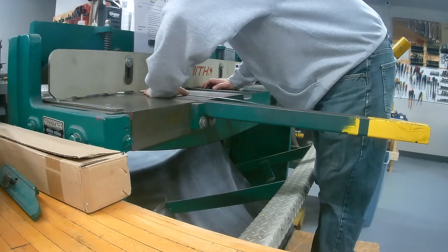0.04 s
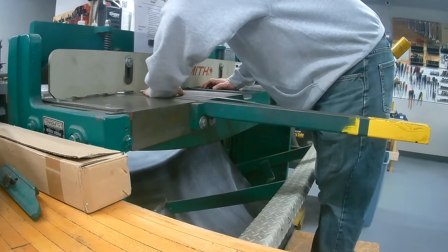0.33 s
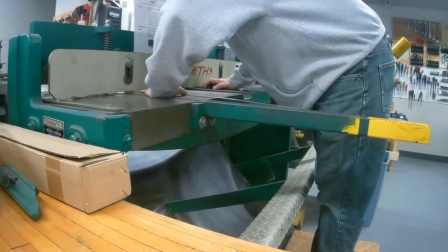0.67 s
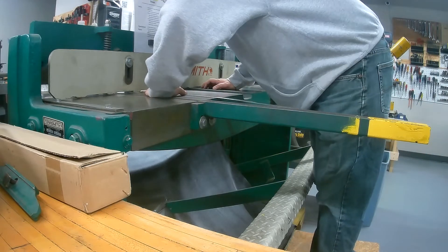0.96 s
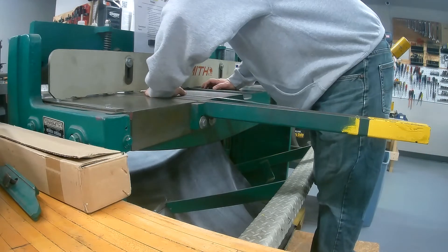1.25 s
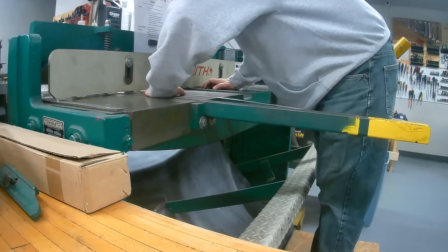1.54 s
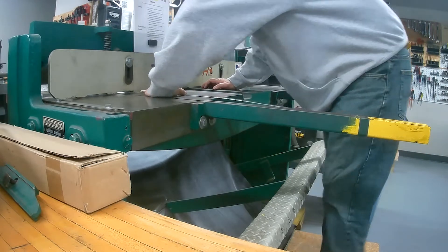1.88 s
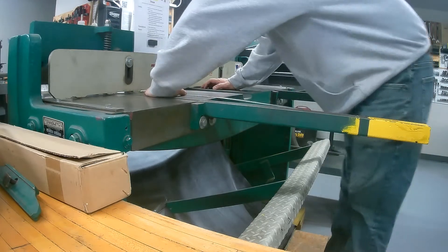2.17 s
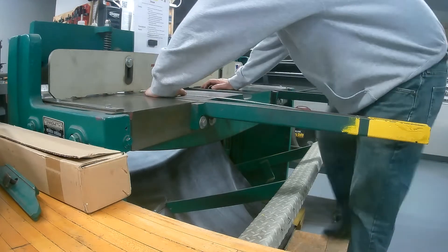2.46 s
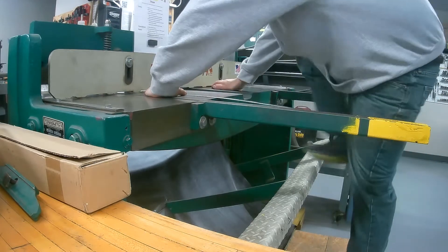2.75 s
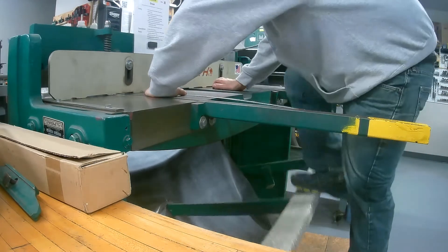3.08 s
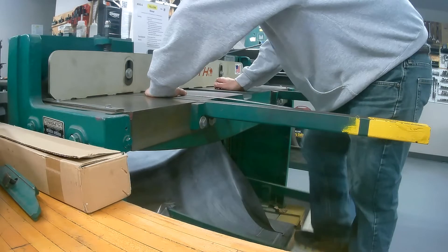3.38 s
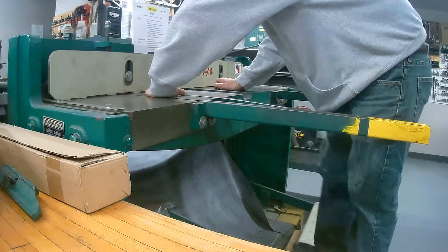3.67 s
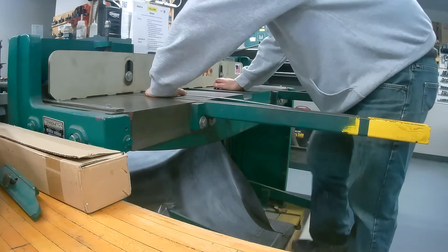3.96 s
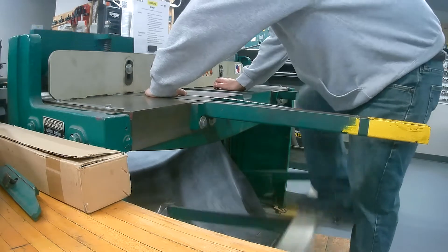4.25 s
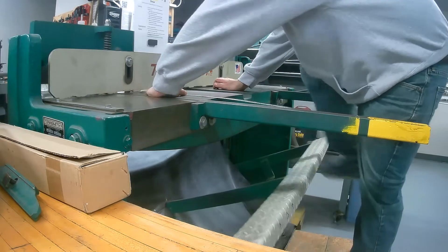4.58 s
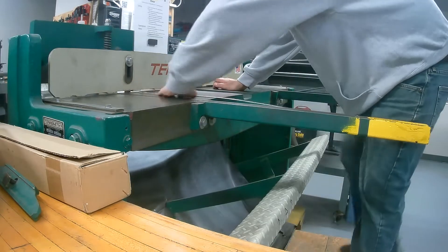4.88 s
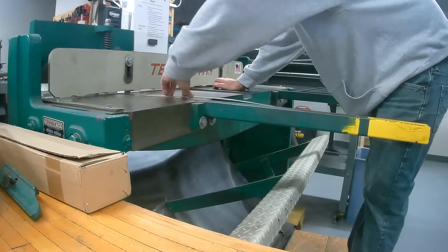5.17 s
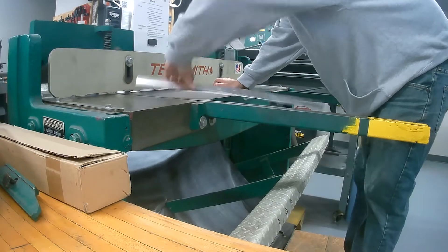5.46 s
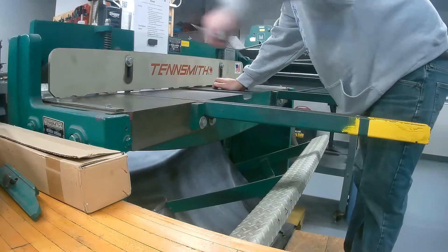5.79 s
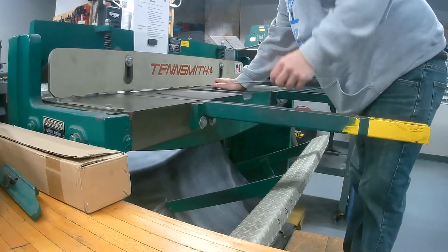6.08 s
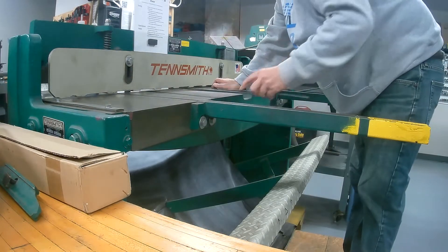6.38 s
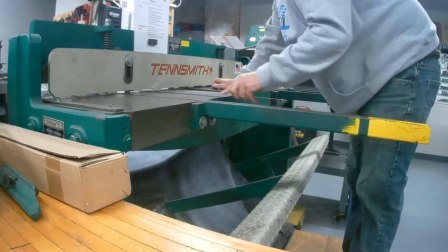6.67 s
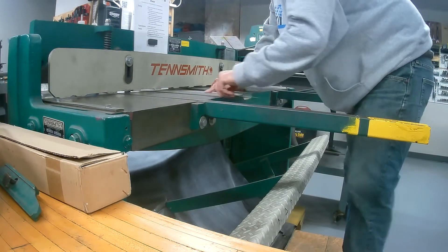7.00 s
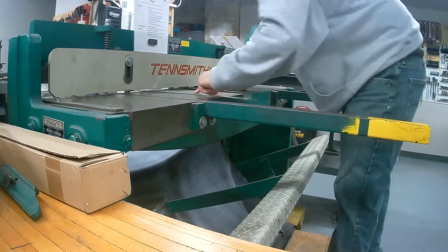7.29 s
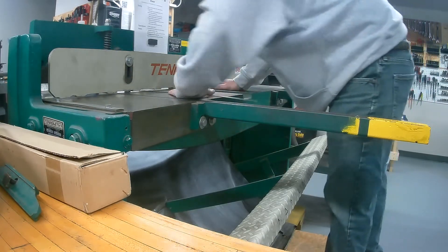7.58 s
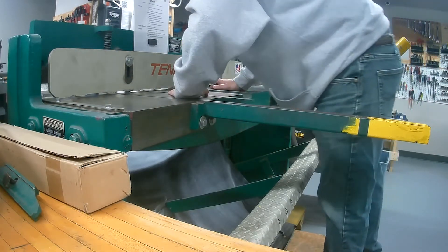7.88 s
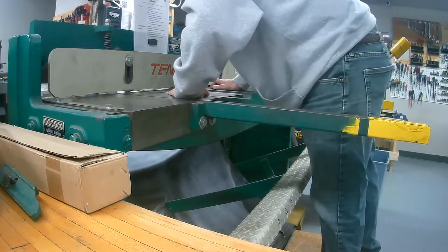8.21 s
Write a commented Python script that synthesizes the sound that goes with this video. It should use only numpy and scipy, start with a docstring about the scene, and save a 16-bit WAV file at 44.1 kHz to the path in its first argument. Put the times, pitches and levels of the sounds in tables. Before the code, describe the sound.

A foot-operated metal shear crunches through a sheet, springs back with a ringing clang, then sheet metal taps and scrapes in a quiet workshop.

```python
"""Treadle shear in a quiet workshop.

The foot drives the blade through a metal sheet; tiny slips and fractures shake the steel and crunch.
The spring rubs the blade back up the cut edge until it clangs on its stop, ringing the frame.
Hands and shoes bump softly; the sheet is tapped and slid over the steel table. Ventilation rumbles."""
import sys
import numpy as np
from scipy import signal
from scipy.fft import rfft, irfft, next_fast_len
from scipy.io import wavfile
from scipy.ndimage import map_coordinates

SR = 44100
rng = np.random.default_rng(int(sys.argv[2]) if len(sys.argv) > 2 else 0)


def store_wav(level_fs):
    """Save 16-bit WAV to argv[1]."""
    pcm = np.round(np.clip(np.atleast_2d(level_fs), -1, 1) * 32767)
    wavfile.write(sys.argv[1], SR, pcm.T.astype(np.int16))


N = 367794


# loaded shear, broad response: f/Hz, level/dB
CUT_COLOUR = [(21, -57), (35, -14.5), (70, -18.5), (97, -26.5), (128, -5.5), (224, -17), (489, -1.5),
              (656, 0), (798, 5), (1180, -4), (1470, -12), (2170, -24), (2770, -42), (4740, -47),
              (5770, -60), (12000, -60), (15600, -78), (22000, -120)]
# loaded shear, resonances: f/Hz, width/Hz, level/dB re broad response
CUT_PEAKS = [(48, 25, 1), (75.3, 7, 12), (127.5, 13.6, 7), (177, 19, 1.5), (524, 21, 4), (626, 6.7, 0),
             (820, 39, 0), (1145, 26, -0.5), (3190, 160, 5.5), (5050, 197, 14.5)]
# load shift; rows frame, blade, sheet edge, grit: level/dB, drift/(dB/s)
CUT_PARTS = [(-32, 14.5), (-24.5, 1), (-25, -13.5), (-52, 8)]
# tearing sheet: f/Hz, level/dB
CRUNCH_COLOUR = [(120, -3), (270, 21), (500, 5.5), (800, 16), (1160, 22.5), (1450, -2), (2150, 8.5),
                 (2800, -2), (3800, -2), (4900, 1.5), (5800, -13), (8000, -18), (11000, -15.5),
                 (15500, -21.5)]

def downstroke():
    """The blade grinds down under the foot, with a bright crunch as the sheet parts."""
    start_s = 2.979
    speed = movement(start_s, attack_s=0.014, rise_db=7, hold_s=0.53, release_s=0.55)
    gains = [speed * amp(db + db_per_s * since(start_s)) for db, db_per_s in CUT_PARTS]
    grind = blade_friction(gains, CUT_COLOUR, CUT_PEAKS, slips_per_s=1600, spread_db=3.5)
    fractures = slips(per_s=1800, spread_db=6.5) * amp(1.7 * wobble(45))
    crunch = coloured(steel(fractures, t60_s=0.06, contrast=0.57), CRUNCH_COLOUR)
    parting = movement(3.14, attack_s=0.1, rise_db=13, hold_s=0.085, release_s=0.025)
    return grind + amp(-27) * parting * crunch


# free blade, broad response: f/Hz, level/dB
RETURN_COLOUR = [(35, -14), (60, -12), (95, -19.5), (134, -4.5), (210, -12.5), (272, -5.5), (330, -8),
                 (489, -8), (581, -12.5), (778, -1), (1400, -24), (1600, -27), (1900, -27), (4630, -33.5),
                 (9000, -45.5)]
# free blade, resonances: f/Hz, width/Hz, level/dB re broad response
RETURN_PEAKS = [(135, 7.2, -11), (270, 32, 2.5), (370, 42, 2.5), (482, 28, 6.5), (797, 85, 1),
                (2320, 43, 3), (3160, 88, 2), (3540, 31, 9), (4740, 200, 11.5)]
# rows frame, blade, sheet edge, grit: level/dB at full speed, speed exponent
RETURN_PARTS = [(-25.5, .9), (-20.5, 1), (-32.5, 1), (-40, 2.14)]

def upstroke():
    """The spring speeds the blade up the cut edge; faster rubs louder and brighter."""
    speed = movement(4.022, attack_s=0.226, rise_db=12.2, hold_s=0.242, release_s=0.03, bend=2.7)
    gains = [amp(db) * speed ** exponent for db, exponent in RETURN_PARTS]
    return blade_friction(gains, RETURN_COLOUR, RETURN_PEAKS, slips_per_s=2600, spread_db=3)


def blade_friction(gains, colour, peaks, slips_per_s, spread_db):
    """Juddering slips shake frame, blade, sheet edge and grit, one band each."""
    drive = slips(slips_per_s, spread_db) * amp(wobble(45))
    heavy = steel(drive, t60_s=0.059, contrast=0.1)
    thin = steel(drive, t60_s=0.18, contrast=0.49)
    bands = [(heavy, 35, 350), (heavy, 350, 1100), (thin, 1100, 2600), (thin, 2700, 9000)]
    return sum(gain * body_band(x, colour, peaks, lo_hz, hi_hz)
               for gain, (x, lo_hz, hi_hz) in zip(gains, bands))


# machine impacts: t/s, relative clang/dB, thud/dB, crack/dB
BLOWS = [(2.986, -35.5, -51, -52), (3.011, -22.5, -28, -54), (3.325, -24, -15.5, -41),
         (3.356, -23.5, -11.5, -58), (3.832, -37, -34, -66), (4.028, -39, -39.5, -65),
         (4.217, -27, -38, -35.5), (4.484, -17, -11, -24), (4.511, -15.5, -20, -41),
         (4.536, -19.5, -19.5, -53)]
# impact spectra: f/Hz, level/dB
CLANG_COLOUR = [(29, -61), (50, -35), (140, 1), (207, -9), (273, -4.5), (320, -11), (637, -4.5), (820, 2.5),
                (1360, -6.5), (1490, -15.5), (1600, -9.5), (1960, -17.5), (2700, -35.5), (4580, -29.5),
                (12000, -91), (15600, -84), (22000, -120)]
THUD_COLOUR = [(30, -19), (70, -18), (120, -1.5), (350, -2), (700, 0), (1200, -13.5), (3000, -48),
               (8000, -80)]
CRACK_COLOUR = [(1000, -20), (2600, -7), (3600, 0), (5200, 3.5), (6200, -9.5), (10000, -35), (15000, -29.5)]
# clang damping: f/Hz, t60/s
CLANG_DECAY = [(100, 0.69), (260, 2.1), (700, 0.95), (1840, 1.11), (4850, 1.6)]

def blows():
    """The blade bites, bottoms out and slams back on its stop."""
    out, t = np.zeros(N), np.arange(2 * SR) / SR
    for start_s, clang_db, thud_db, crack_db in BLOWS:
        clang = amp(clang_db - 5) * burst(CLANG_COLOUR, CLANG_DECAY)
        thud = amp(thud_db + 1) * burst(THUD_COLOUR, [(100, 0.24), (800, 0.13)])
        crack = amp(crack_db + 1.5) * burst(CRACK_COLOUR, [(4000, 0.13), (10000, 0.08)])
        add(out, start_s, (clang + thud + crack) * (1 - np.exp(-t / 0.0019)))
    return out


# frame modes: f/Hz, relative level/dB, t60/s
FRAME_MODES = [(71.8, -20.5, 2.2), (132.6, -8.5, 0.71), (139.8, -11, 0.59), (170.2, -18, 0.92),
               (279.8, -4, 0.74), (385, -18, 1.3), (494, -15, 2.3), (558, -11, 1.2), (730, -9, 1.14),
               (784, -28.5, 3.6), (815, -5.5, 1.04), (842, -23.5, 3.17), (880, -13, .8), (993, -7.5, 0.58),
               (1328, -8.5, 0.94), (1324, 2.5, 0.24), (1618, -1, 0.64), (1683, -10, 0.4), (1940, -3, 0.64),
               (1990, -13.5, 0.62), (2580, -19, 0.45), (3080, -27.5, 0.88), (3540, -31, .6),
               (4000, -25, 0.45), (4662, -26, 1.02), (5250, -32.5, 1.3)]

def frame_ring():
    """The treadle's upper stop rings the frame; loose joints make each mode wander and flutter."""
    out, t = np.zeros(N), np.arange(2 * SR) / SR
    stop_s = 4.508
    onset = amp(-16) * (1 - np.exp(-t / 0.0029))
    for hz, db, t60_s in FRAME_MODES:
        linewidth_hz = 5.4 * np.sqrt(hz / 1500)
        wander_rad = np.cumsum(rng.standard_normal(len(t))) * np.sqrt(2 * np.pi * linewidth_hz / SR)
        flutter_db = 2.3 * np.interp(t, np.linspace(0, t[-1], 90), rng.standard_normal(90))
        mode = np.sin(2 * np.pi * (hz * t + rng.random()) + wander_rad)
        add(out, stop_s, onset * amp(db + flutter_db - 60 * t / t60_s) * mode)
    return out


# steel sticking on steel: centre t/s, half length/s, f/Hz, relative level/dB
SQUEALS = [(2.989, .008, 624, -18), (3.026, .012, 801, -14), (3.07, .06, 4970, -54), (3.56, .12, 5190, -54),
           (4.1, .06, 2163, -50.5), (4.22, .07, 2500, -47.5), (4.219, .011, 782, -14),
           (4.242, .012, 784, -9), (4.35, 0.027, 3120, -41), (4.406, .02, 799, -15),
           (4.441, 0.1, 1552, -30.5), (6.398, .23, 4700, -63)]

def squeals():
    """Brief stick-slip locks onto a steel mode, slightly unsteady in pitch."""
    out, t = np.zeros(N), np.arange(N) / SR
    drift_hz = 8 * wobble(70)
    for centre_s, half_s, hz, db in SQUEALS:
        near = abs(t - centre_s) < 2 * half_s
        swell = np.exp(-2 * ((t[near] - centre_s) / half_s) ** 2)
        out[near] += amp(db + 2) * swell * np.sin(2 * np.pi * np.cumsum(hz + drift_hz[near]) / SR)
    return out


# hand and shoe contacts: t/s, relative level/dB, thump offset/dB
BUMPS = [(1.637, -37.5, -26), (1.951, -33.5, -13.5), (1.989, -37.5, -14), (2.884, -41, -3),
         (2.936, -39, -4), (5.033, -24.5, -6), (5.084, -28.5, -10.5), (5.809, -37.5, -25),
         (6.314, -40, -19), (6.943, -37.5, -25), (7.199, -32, -6.5), (7.267, -36, -16), (7.308, -34.5, -7)]
# contact spectra: f/Hz, level/dB
KNOCK_COLOUR = [(120, -14), (220, -5.5), (340, 2.5), (460, -5.5), (700, -15), (1100, -22.5), (3000, -41),
                (8000, -62)]
THUMP_COLOUR = [(40, -20), (90, -3), (140, -2.5), (220, 0.5), (350, -14), (1000, -44), (4000, -80)]

def bumps():
    """Soft contacts give a dull, damped knock; heavier ones also shake the floor."""
    out, t = np.zeros(N), np.arange(2 * SR) / SR
    for start_s, db, offset_db in BUMPS:
        knock = amp(db - 4.5) * burst(KNOCK_COLOUR, [(300, 0.086), (800, 0.26)])
        thump = amp(db + offset_db + 3) * burst(THUMP_COLOUR, [(100, 0.2), (300, 0.13)])
        add(out, start_s, (knock + thump) * (1 - np.exp(-t / 0.0013)))
    return out


# sheet on table, broad response: f/Hz, level/dB
SHEET_COLOUR = [(300, 6.5), (600, -5), (850, 3.5), (1150, -0.5), (1500, -9.5), (2100, -4.5), (2750, -11),
                (3400, -7), (4400, 1), (6000, -1), (8500, -8.5), (10500, -6), (12500, -13), (15500, -15)]
# sheet resonances: f/Hz, width/Hz, level/dB re broad response
SHEET_PEAKS = [(800, 42, 0), (1175, 8.4, 8), (2078, 15, 4), (3540, 30, 9), (4280, 21, 13), (4610, 41, 9),
               (5010, 110, 9), (5330, 33, 5), (5840, 20, -7), (6630, 30, 8), (7620, 28, 11), (9960, 86, 11),
               (10400, 40, 10), (11300, 250, 9)]
# singing modes: f/Hz, relative level/dB
SHEET_SONG = [(1195, -9.5), (2085, -15.5), (4250, -7.5), (10400, -12)]

def push():
    """The sheet breaks loose with a sharp scratch and slides to rest, its clearest modes singing."""
    start_s, t = 7.32, np.arange(N) / SR
    speed = movement(start_s, attack_s=0.12, rise_db=6, hold_s=0.01, release_s=0.37)
    breakaway_db = 8 * np.exp(-since(start_s) / 0.011)
    scrape = slide(SHEET_COLOUR, SHEET_PEAKS, body_db=-44.5, scratch_db=-41 + breakaway_db)
    song = sum(amp(db + 2.3 * wobble(24)) * np.sin(2 * np.pi * hz * t + 0.5 * wobble(25))
               for hz, db in SHEET_SONG)
    return speed * (scrape + amp(-41.5) * song)


# sheet taps: t/s, level/dB, tick/dB re clack
TAPS = [(2.853, -46.5, -34), (5.172, -41, -1.5), (5.41, -49.5, -7), (6.1, -45.5, -1.5), (7.321, -45, -14)]
# clack spectrum: f/Hz, level/dB
CLACK_COLOUR = [(200, -12), (500, -2.5), (720, 3.5), (850, 6.5), (1050, -10), (2200, -10.5), (3000, -21),
                (8000, -47)]

def taps():
    """The sheet drops flat on the table with a short tinny clack."""
    out = np.zeros(N)
    for start_s, db, tick_db in TAPS:
        clack = burst(CLACK_COLOUR, [(700, 0.56), (3000, 0.52)])
        tick = burst(SHEET_COLOUR, [(2000, 0.35), (10000, 0.16)])
        add(out, start_s, amp(db) * (clack + amp(tick_db) * tick))
    return out


# light pushes: t/s, attack/s, rise/dB, hold/s, release/s, relative level/dB
NUDGES = [(6.2, 0.025, 5, 0.045, 1.0, -56), (7.024, .02, 4, 0.12, 0.23, -58.5)]
# light scrape: f/Hz, level/dB
NUDGE_COLOUR = [(400, -7), (800, 4), (1100, -7.5), (2200, -11), (3200, -21.5), (4200, -14.5), (4700, -10),
                (5100, -11), (5800, -17), (8500, -23.5), (10000, -17.5), (14000, -25)]

def nudges():
    """The sheet scrapes faintly as it is lined up."""
    speed = sum(amp(db) * movement(*shape) for *shape, db in NUDGES)
    return speed * slide(NUDGE_COLOUR, [(4600, 120, 4)], body_db=-1, scratch_db=-0.5)


def slide(colour, peaks, body_db, scratch_db):
    """Burrs catch on the table and ring the sheet's modes."""
    catches = slips(per_s=5000, spread_db=2) * amp(1.1 * wobble(65))
    ringing = steel(catches, t60_s=0.097, contrast=0.97)
    low = body_band(ringing, colour, peaks, lo_hz=380, hi_hz=2650)
    high = body_band(ringing, colour, peaks, lo_hz=2830, hi_hz=15000)
    return amp(body_db) * low + amp(scratch_db) * high


# palm wipes: centre t/s, half length/s, start f/Hz, end f/Hz, level/dB
SWISHES = [(6.758, .14, 2190, 948, -64.5), (7.139, .1, 2306, 1350, -64)]

def swishes():
    """A palm rubs the sheet; the narrow resonance falls as it travels."""
    out, t = np.zeros(N), np.arange(N) / SR
    for centre_s, half_s, start_hz, end_hz, db in SWISHES:
        hz = np.interp(t, [centre_s - half_s, centre_s + half_s], [start_hz, end_hz])
        carrier = np.exp(2j * np.pi * np.cumsum(hz) / SR)
        rub = unit(np.real((wobble(650) + 1j * wobble(600)) * carrier))
        out += amp(db) * np.exp(-((t - centre_s) / half_s) ** 4) * rub
    return out


# reverberation: f/Hz, t60/s
ROOM_DECAY = [(150, 0.76), (1000, 0.67), (5000, 0.62), (12000, 0.28)]

def room(x):
    """Diffuse wall reflections, 10 ms late."""
    tail = burst([(100, 0), (10000, -8)], ROOM_DECAY)[:SR]
    return signal.fftconvolve(x, np.pad(tail / np.linalg.norm(tail), (SR // 100, 0)))[:N]


# ventilation spectrum: f/Hz, level/dB
AIR_COLOUR = [(12, -33), (20, 2), (59, 0.5), (90, -11), (157, -9), (196, -15.5), (232, -11.5), (393, -19.5),
              (492, -13.5), (565, -21.5), (726, -24.5), (1040, -26.5), (6030, -32.5), (11100, -34),
              (15500, -32.5)]
# duct tones: f/Hz, width/Hz, level/dB re broad noise
DUCT_PEAKS = [(490, 6.1, -5.5), (597, 10, -3), (783, 110, 7), (10230, 70, 10), (11060, 700, 2.5)]

def ventilation():
    """Steady air rumble with faint duct tones."""
    return amp(-50) * unit(filtered(rng.standard_normal(N), lambda hz: body(hz, AIR_COLOUR, DUCT_PEAKS)))


# hiss spectrum: f/Hz, level/dB
HISS_COLOUR = [(2000, -3), (4800, 9.5), (6500, 2.5), (9500, 0.5), (10500, 9.5), (12200, -3.5), (14000, 5),
               (15600, -8)]

def hiss():
    """A thin hiss swells while the machine works."""
    swell = movement(3.08, attack_s=0.68, rise_db=10, hold_s=1.47, release_s=0.47)
    return amp(-53.5) * swell * coloured(rng.standard_normal(N), HISS_COLOUR)


def movement(start_s, attack_s, rise_db, hold_s, release_s, bend=1):
    """Speed envelope, peak 1: sets in, gathers pace (later with more bend), holds, tapers."""
    t = np.arange(N) / SR - start_s
    onset = np.clip(t / 0.005, 0, 1)
    rise = amp(-rise_db * (1 - np.clip(t / attack_s, 0, 1) ** bend))
    taper = np.clip(1 - (t - attack_s - hold_s) / release_s, 0, 1) ** 1.53
    return onset * rise * taper


def slips(per_s, spread_db):
    """Tiny slips and fractures, random in time and size."""
    impulses = (rng.random(N) < per_s / SR) * rng.choice([-1, 1], N)
    return unit(impulses * amp(spread_db * np.clip(rng.standard_normal(N), -2, 2)))


def steel(drive, t60_s, contrast):
    """Dense plate modes hold each slip briefly and comb its spectrum."""
    t = np.arange(SR // 3) / SR
    modes = rfft(rng.standard_normal(len(t)) * amp(-60 * t / t60_s))
    return signal.fftconvolve(drive, irfft(modes * abs(modes) ** (contrast - 1)))[:N]


def burst(colour, decay):
    """Dense modes struck at once; decay lists f/Hz, t60/s."""
    noise = coloured(rng.standard_normal(2 * SR), colour)
    hz, t, spectra = signal.stft(noise, SR, nperseg=256)
    return signal.istft(spectra * amp(-60 * t / along(decay, hz)[:, None]), SR)[1][:2 * SR]


def body(hz, colour, peaks):
    """Gain of a broad response with resonances on it."""
    power = sum(amp(db) ** 2 / (1 + (2 * (hz - peak_hz) / width_hz) ** 2)
                for peak_hz, width_hz, db in peaks)
    return amp(along(colour, hz)) * np.sqrt(1 + power)


def body_band(x, colour, peaks, lo_hz, hi_hz):
    """One band of a body's response to x, rms 1."""
    def response(hz):
        rolloff = np.sqrt((1 + (lo_hz / (hz + 1)) ** 12) * (1 + (hz / hi_hz) ** 12))
        return body(hz, colour, peaks) / rolloff
    return unit(filtered(x, response))


def coloured(x, colour):
    """x shaped by a spectrum, rms 1."""
    return unit(filtered(x, lambda hz: amp(along(colour, hz))))


def filtered(x, response):
    """Apply a gain over frequency."""
    size = next_fast_len(len(x) + 8192)
    return irfft(rfft(x, size) * response(np.fft.rfftfreq(size, 1 / SR)), size)[:len(x)]


def wobble(knots_per_s):
    """Smooth random curve."""
    knots = rng.standard_normal(int(N * knots_per_s / SR) + 4)
    return map_coordinates(knots, [np.arange(N) * knots_per_s / SR], order=2)


def along(points, hz):
    """Interpolate over log frequency."""
    points_hz, values = np.transpose(points)
    return np.interp(np.log(hz + 1), np.log(points_hz + 1), values)


def since(start_s):
    """Elapsed seconds, capped at 1."""
    return np.clip(np.arange(N) / SR - start_s, 0, 1)


def add(track, start_s, sound):
    """Mix in place."""
    part = track[round(start_s * SR):][:len(sound)]
    part += sound[:len(part)]


def amp(db):
    """dB to gain."""
    return 10 ** (np.asarray(db) / 20)


def unit(x):
    """Scale to rms 1."""
    return x / np.sqrt(np.mean(x ** 2) + 1e-20)


def notch(hz, centre_hz=2750, width_hz=190, db=-7):
    """Gain that hollows out one narrow band."""
    return amp(db / (1 + (2 * (hz - centre_hz) / width_hz) ** 2))


def scene():
    """Shear and handling in the room, over the background; mono."""
    machine = downstroke() + upstroke() + squeals() + blows() + frame_ring()
    handling = bumps() + taps() + swishes() + nudges() + push()
    reverb = room(amp(-12) * machine + amp(-9.5) * handling)
    return (filtered(machine + handling + reverb, notch) + ventilation() + hiss())[None]


def record(dry, top_hz=15700):
    """Brick-wall low-pass."""
    return np.array([filtered(channel, lambda hz: hz < top_hz) for channel in dry])


dry = scene()
out = record(dry)
store_wav(out)
```